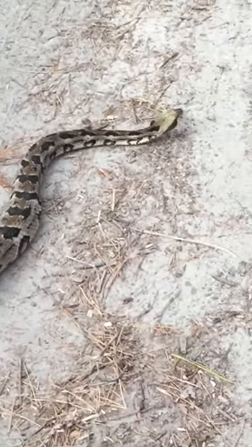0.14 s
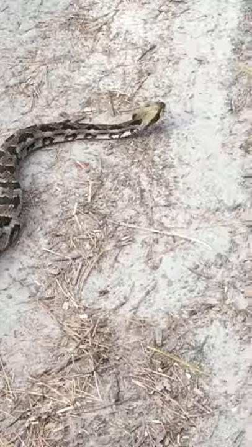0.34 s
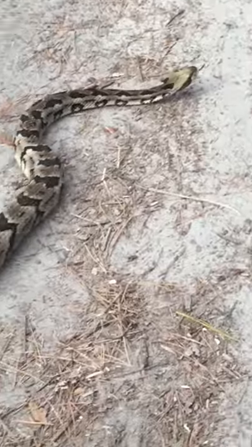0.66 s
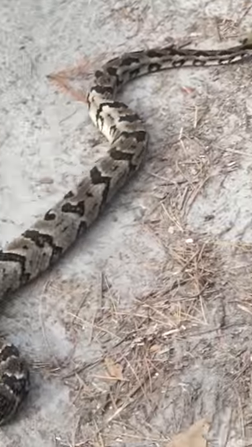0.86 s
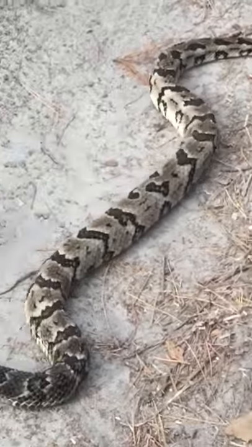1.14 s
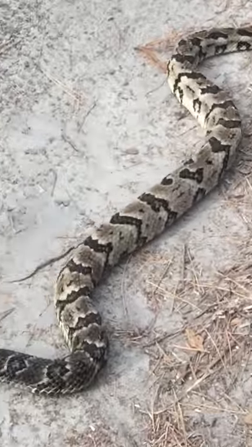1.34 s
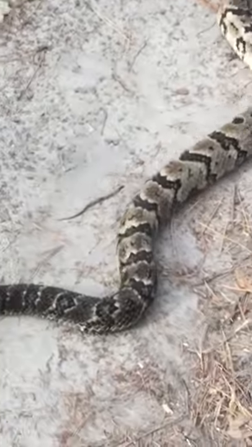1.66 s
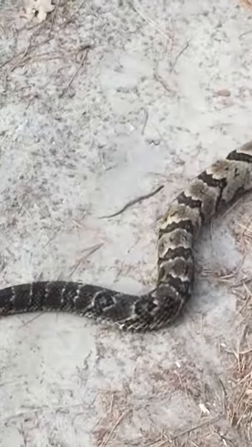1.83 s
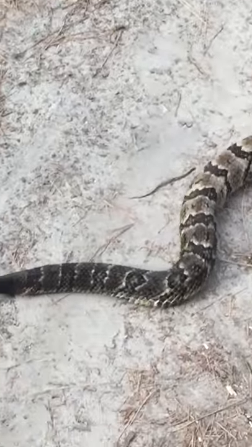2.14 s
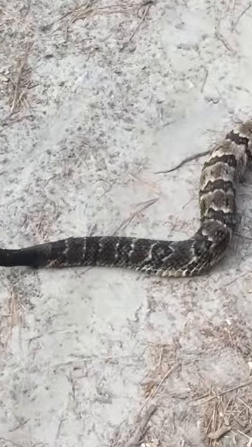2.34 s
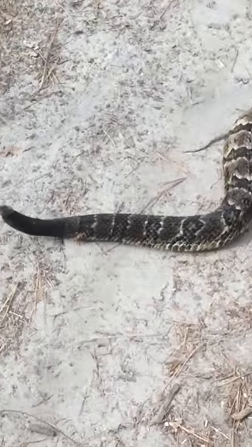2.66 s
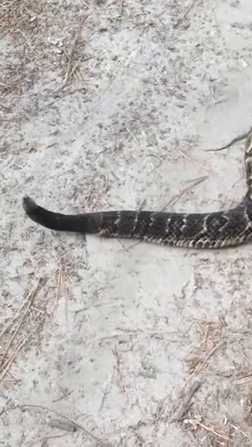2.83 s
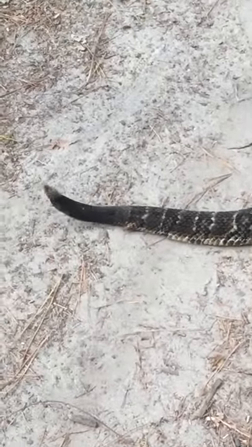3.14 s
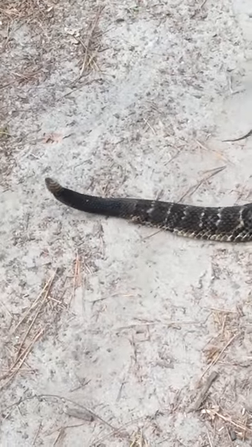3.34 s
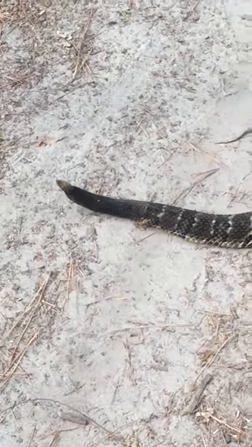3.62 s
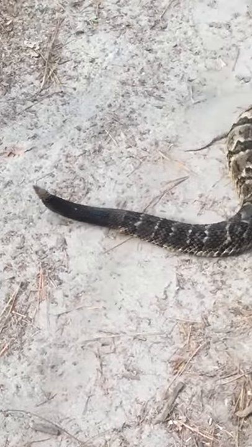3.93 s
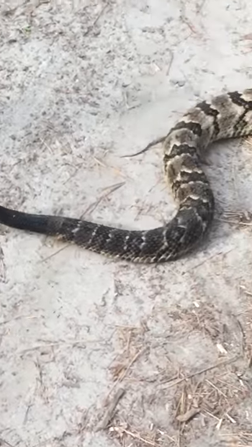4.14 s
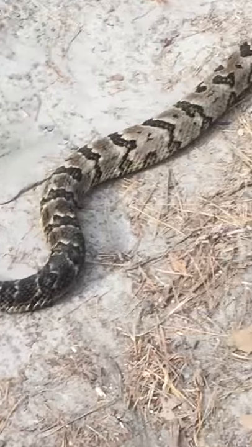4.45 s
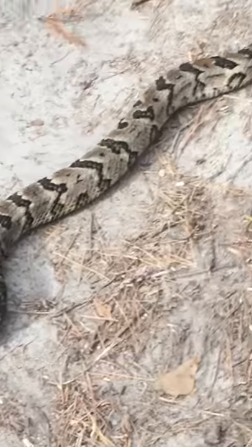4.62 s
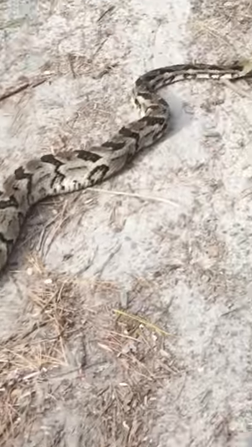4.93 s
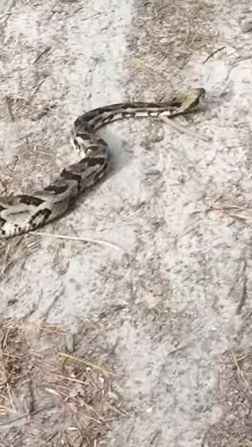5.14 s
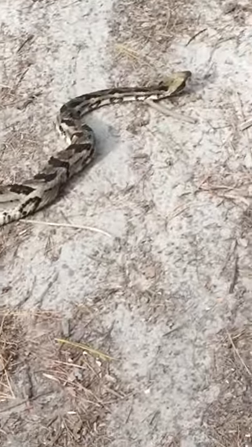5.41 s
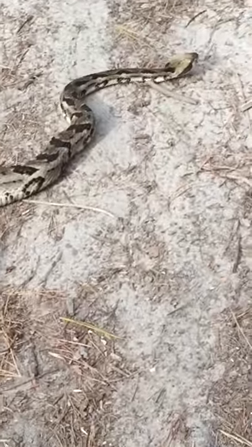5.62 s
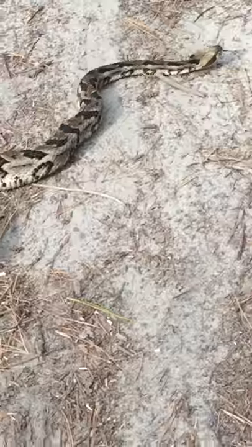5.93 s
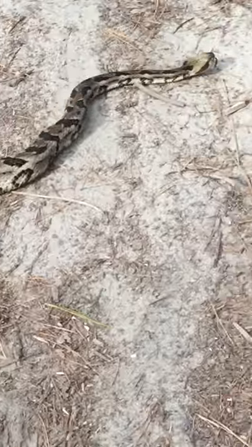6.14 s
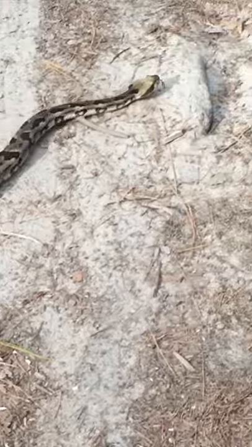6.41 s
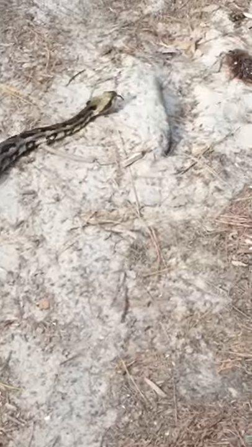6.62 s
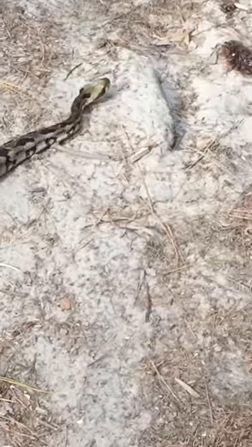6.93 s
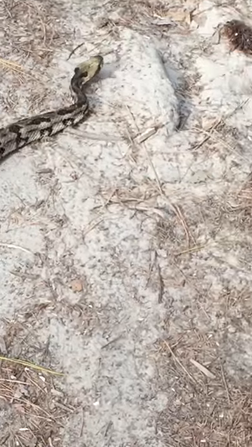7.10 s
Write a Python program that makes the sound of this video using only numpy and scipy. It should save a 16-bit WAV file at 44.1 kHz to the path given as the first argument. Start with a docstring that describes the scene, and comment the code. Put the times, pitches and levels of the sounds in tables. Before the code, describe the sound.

A rattlesnake shakes its tail close by in one dense, unbroken high-pitched buzz, over faint outdoor air and a few soft low bumps.

```python
"""A dense, unbroken buzz comes first: a rattlesnake shakes its tail a step away from the microphone.
At each turn of the tail, some 95 times a second, the loose horny segments knock together in a short cascade
of noise bursts; their hollow shells filter the buzz, brighter or duller as the tail changes pose.
Below lie faint outdoor air, made of filtered noise, and soft low bumps, made of swelling cosines."""
import sys
import numpy as np
from scipy import signal
from scipy.fft import rfft, irfft, next_fast_len
from scipy.io import wavfile
from scipy.ndimage import uniform_filter1d, map_coordinates

SR = 44100
rng = np.random.default_rng(int(sys.argv[2]) if len(sys.argv) > 2 else 0)


def store_wav(level_fs):
    """Save 16-bit WAV to argv[1]."""
    pcm = np.round(np.clip(np.atleast_2d(level_fs), -1, 1) * 32767)
    wavfile.write(sys.argv[1], SR, pcm.T.astype(np.int16))


N = 320607


def amp(db):
    """Level to amplitude: 20 dB is a factor of ten."""
    return 10 ** (np.asarray(db) / 20)


def unit(x):
    """Normalisation to an rms value of 1."""
    return x / np.sqrt(np.mean(x ** 2) + 1e-20)


def along(points, hz):
    """Interpolation of (Hz, value) points on a logarithmic frequency axis."""
    point_hz, values = np.transpose(points)
    return np.interp(np.log(hz + 1), np.log(point_hz + 1), values)


def curve(rows):
    """Linear interpolation of (s, value) rows, one value per sample."""
    return np.interp(np.arange(N) / SR, *np.transpose(rows))


def swell(centre_s, width_s):
    """Gaussian envelope: a smooth rise to 1 and fall back to 0."""
    return np.exp(-((np.arange(N) / SR - centre_s) / width_s) ** 2)


def wobble(rate):
    """Slow random modulation: a spline through random knots, rate of them a second."""
    knots = rng.standard_normal(int(N * rate / SR) + 4)
    return map_coordinates(knots, [np.arange(N) * rate / SR])


def filtered(x, response):
    """Linear filtering: the spectrum of x times a real response, without phase shift."""
    size = next_fast_len(N + SR // 2)
    hz = np.fft.rfftfreq(size, 1 / SR)
    return irfft(rfft(x, size) * response(hz), size)[:N]


def ring(spectrum, size=2048):
    """Minimum-phase response: a folded cepstrum makes a body with this spectrum ring after the blow only."""
    magnitude = amp(along(spectrum, np.fft.rfftfreq(size, 1 / SR)))
    cepstrum = irfft(np.log(magnitude))
    cepstrum[1:size // 2] *= 2
    cepstrum[size // 2 + 1:] = 0
    return irfft(np.exp(rfft(cepstrum)))


def patchy_noise(spectrum, patchy_db, size=1024):
    """Coloured noise of rms 1 by short-time synthesis: its bands swell and sink each on their own."""
    cells = signal.stft(rng.standard_normal(N), nperseg=size)[2]
    field = uniform_filter1d(rng.standard_normal(cells.shape), size=3, axis=0)  # across bands
    field = uniform_filter1d(field, size=7, axis=1)  # along time
    noise = signal.istft(cells * amp(patchy_db * unit(field)), nperseg=size)[1][:N]
    return unit(filtered(noise, lambda hz: amp(along(spectrum, hz))))


def air(rumble_db=-60, lumps_db=2.5, hush_db=-58.5):
    """Broadband ambience: a low, lumpy rumble and a distant hush, steady but for one soft gust."""
    # Spectrum of the low rumble. Each row: frequency in Hz, relative level in dB per Hz
    rumble_spectrum = [(20, -29), (35, -14), (50, -6.5), (65, 0), (90, -4), (150, -9.5), (200, -13),
                       (280, -20.5), (600, -35), (2000, -80)]
    # Spectrum of the distant hush. Each row: frequency in Hz, relative level in dB per Hz
    hush_spectrum = [(120, -29), (280, -9), (480, -6), (650, -2.5), (920, 0.5), (1300, -4.5), (1900, -10.5),
                     (8000, -20.5)]
    gust_s, gust_width_s, gust_db = 6, 0.28, 2.5  # moment, Gaussian width, rise at the peak
    rumble_gain = amp(rumble_db + lumps_db * wobble(12))
    rumble = rumble_gain * patchy_noise(rumble_spectrum, patchy_db=2.0)
    hush_gain = amp(hush_db + gust_db * swell(gust_s, gust_width_s))
    return rumble + hush_gain * patchy_noise(hush_spectrum, patchy_db=3.0)


def bumps():
    """Low-frequency tone bursts: each bump is a few deep cycles under a Gaussian envelope."""
    # Soft bumps. Each row: centre in seconds, peak level in dB, pitch in Hz, Gaussian width in seconds
    bump_rows = [(0.223, -39.5, 56, 0.011), (.35, -35, 62, 0.028), (.62, -46, 54, .018),
                 (1.16, -52.5, 145, .022), (1.809, -45, 72, 0.013), (1.97, -48, 65.6, 0.028),
                 (2.15, -45, 54.6, .025)]
    t = np.arange(N) / SR
    out = np.zeros(N)
    for centre_s, db, hz, width_s in bump_rows:
        out += amp(db) * swell(centre_s, width_s) * np.cos(2 * np.pi * hz * (t - centre_s))
    return out


def cascade(starts, swing, knock_db=1.0, stroke_db=0.73, rise_s=0.00038):
    """Successive impacts: segment after segment knocks and chatters in its socket, as decaying noise."""
    t = np.arange(SR // 80) / SR  # each burst is cut at 12.5 ms
    force = amp(stroke_db * rng.standard_normal(len(starts)))  # shared by all knocks of a stroke
    out = np.zeros(N)
    for delay, scatter, db, t60 in swing:
        late, hard = rng.standard_normal((len(starts), 2)).T
        envelope = amp(-60 * t / t60) * (1 - np.exp(-t / rise_s))
        burst = rng.standard_normal((len(starts), len(t))) * envelope
        strength = force * amp(db + knock_db * hard)
        burst *= (strength / np.linalg.norm(burst, axis=1))[:, None]  # equal energy before strength
        onset = np.round(np.abs(starts + delay + scatter * late) * SR).astype(int)
        places = onset[:, None] + np.arange(len(t))
        out += np.bincount(places.ravel(), burst.ravel(), N)[:N]  # overlapping bursts add
    return out


def knocks(jitter_s=.0001):
    """Quasi-periodic excitation: the tail swings back and out in turn; each reversal starts a cascade."""
    # Pace of the tail, with a spurt near the end. Each row: time in seconds, strokes per second
    pace = [(0.0, 94.61), (1.24, 94.14), (1.77, 95.97), (1.83, 94.84), (3.28, 93.45), (4.0, 94.28),
            (4.29, 91.95), (4.81, 94.16), (5.5, 93.35), (6.12, 99.29), (6.65, 96.0), (6.91, 98.67),
            (7.27, 96.98)]
    # Knocks of the swing out. Each row: delay in s, time scatter in s, relative energy in dB, t60 in s
    swing_out = [(.0002, 0.00019, -8, 0.0077), (.0026, .0002, -.5, .0037), (.003, .0003, -3, 0.015),
                 (.0042, .0004, -10, 0.0078), (.006, .0008, -16, 0.013)]
    # Knocks of the swing back. Each row: delay in s, time scatter in s, relative energy in dB, t60 in s
    swing_back = [(0, .0002, -7.5, 0.0068), (.0011, .00018, -5.5, .0045), (.0022, .00018, -0.2, 0.005),
                  (.0029, .0003, -3.5, 0.014), (.0047, .0006, -12.5, 0.0089)]
    first_stroke_s = .0043
    strokes = np.cumsum(curve(pace)) / SR  # strokes made so far
    count = int(strokes[-1]) + 1
    starts = first_stroke_s + np.interp(np.arange(count), strokes, np.arange(N) / SR)
    starts = starts + jitter_s * rng.standard_normal(count)
    return unit(cascade(starts[0::2], swing_back) + cascade(starts[1::2], swing_out))


def steadied(x, size=2800):
    """Level smoothing: the buzz is divided by its running rms, so its loudness stays even over a few strokes."""
    power = uniform_filter1d(uniform_filter1d(x ** 2, size), size)
    return unit(x / np.sqrt(np.abs(power) + 1e-12))


def rattle(rub_db=-19):
    """Source and filter: knocks and a faint steady rub ring the shells, whose colour glides with the pose."""
    # Loudness of the buzz. Each row: time in seconds, level in dB
    effort = [(0, -31.5), (.13, -33.5), (1.5, -34), (5.37, -33), (6.55, -35), (6.98, -33.5), (7.03, -31.5),
              (7.2, -33)]
    # Pose of the tail. Each row: time in seconds, place among the shell spectra (0 dullest, 3 brightest)
    pose_rows = [(0, 1), (.5, 0), (2.75, 0), (3.15, .5), (3.65, 2.5), (4.3, 2), (4.95, 1), (5.8, 1.75),
                 (6.2, 3), (6.8, 3), (7.05, 2.2)]
    # Colour of the hollow segments, a list per pose. Each row: frequency in Hz, relative level in dB per Hz
    shells = [
        [(1500, -46), (2300, -32), (2700, -21), (3100, -8), (3650, -7.5), (3950, -2), (4400, 0.5), (4850, -7.5),
         (5350, -12), (6000, -6), (6900, -5.5), (7700, -16.5)],
        [(1500, -35), (2300, -34.5), (2750, -24.5), (3200, -10.5), (3650, -8), (4000, -1.5), (4400, 1.5),
         (4900, -2), (5500, 1), (6100, -5.5), (6900, -10), (7700, -14)],
        [(1500, -41.5), (2300, -31.5), (2800, -28.5), (3250, -15.5), (3650, -14), (4000, -4), (4400, 1.5),
         (4900, -4.5), (5700, 0.5), (6200, -3), (6900, -10), (7700, -16)],
        [(1500, -33), (2300, -24), (2800, -21.5), (3300, -14.5), (3700, -18.5), (4050, -11), (4400, -7.5),
         (4900, -6.5), (5450, -0.5), (6100, -2.5), (6950, -4), (7800, -17)],
    ]
    # Bright edge of the clicks, alike in every pose. Each row: frequency in Hz, relative level in dB per Hz
    edge = [(8800, -15.5), (10000, -16.5), (10450, -22.5), (11200, -17), (12300, -17.5), (13300, -12.5),
            (14100, -13), (15000, -14.5), (16000, -21)]
    # The microphone swings toward the tail and away again; the clicks are brightest on its axis
    aim_s, aim_width_s = 3.6, 2.2  # moment and Gaussian width
    on_axis_db, off_axis_db = 1.2, -1.0  # treble gain

    drive = knocks() + amp(rub_db) * rng.standard_normal(N)
    pose = np.clip(curve(pose_rows), 0, len(shells) - 1)
    buzz = np.zeros(N)
    for k, shell in enumerate(shells):
        share = np.maximum(1 - np.abs(pose - k), 0)  # crossfade between neighbouring poses
        response = ring(list(shell) + list(edge))
        buzz += share * unit(signal.fftconvolve(drive, response)[:N])
    treble = filtered(buzz, lambda hz: along([(7000, 0), (9000, 1)], hz))
    aim_db = off_axis_db + (on_axis_db - off_axis_db) * swell(aim_s, aim_width_s)
    buzz += (amp(aim_db) - 1) * treble
    return amp(curve(effort)) * steadied(buzz)


def scene():
    """Superposition: the rattle, the bumps and the air add in one channel."""
    return (rattle() + bumps() + air())[None]


def record(dry):
    """Band limitation: nothing above the top frequency is kept."""
    top_hz = 15950
    return np.array([filtered(channel, lambda hz: hz < top_hz) for channel in dry])


dry = scene()
out = record(dry)
store_wav(out)
```